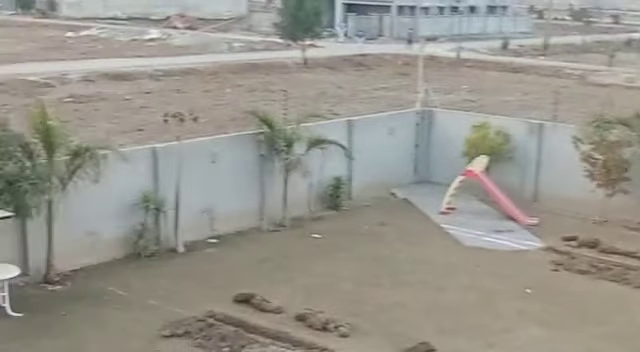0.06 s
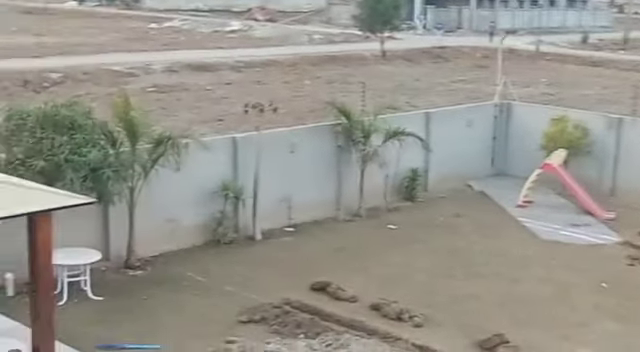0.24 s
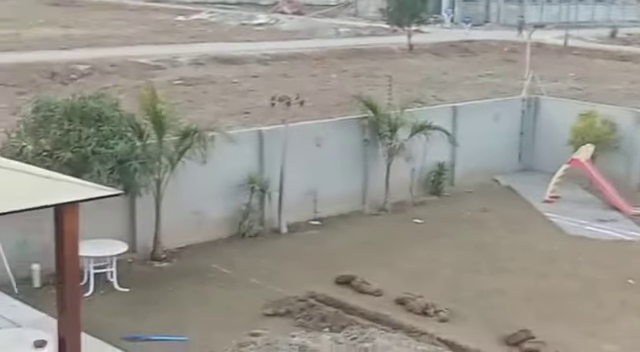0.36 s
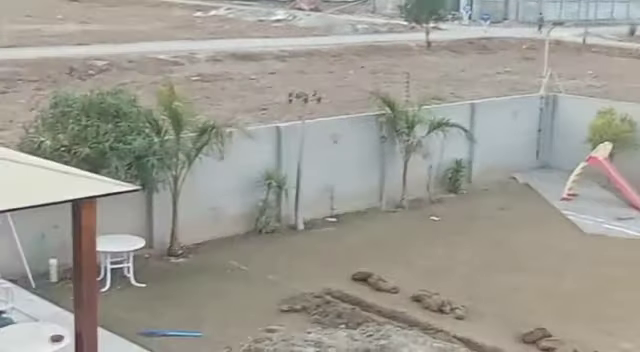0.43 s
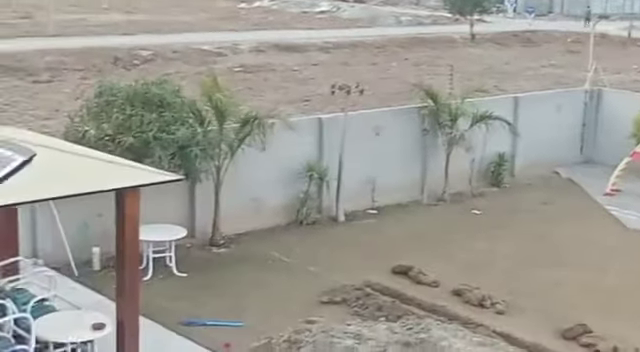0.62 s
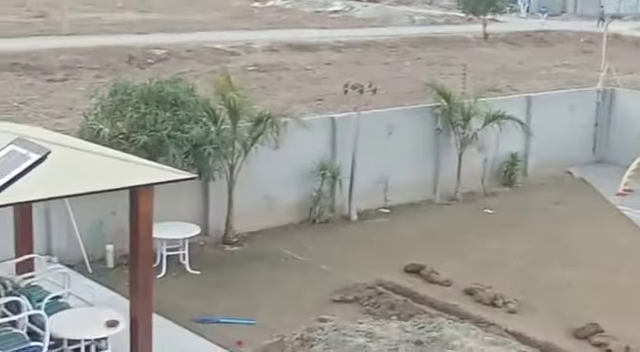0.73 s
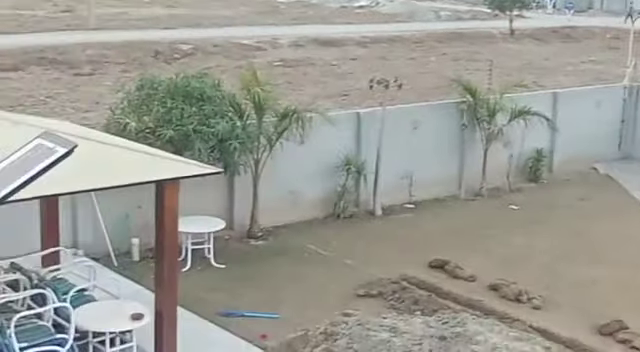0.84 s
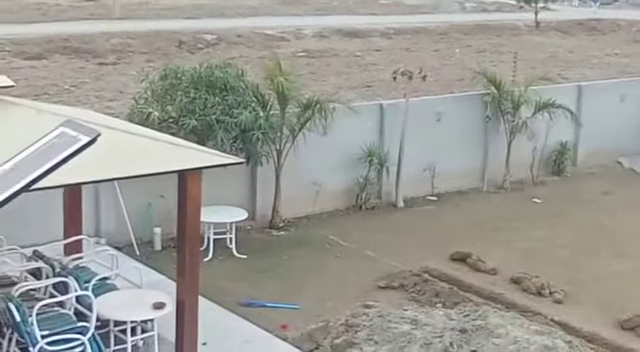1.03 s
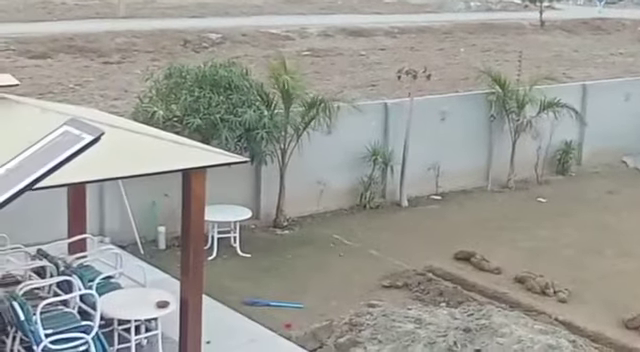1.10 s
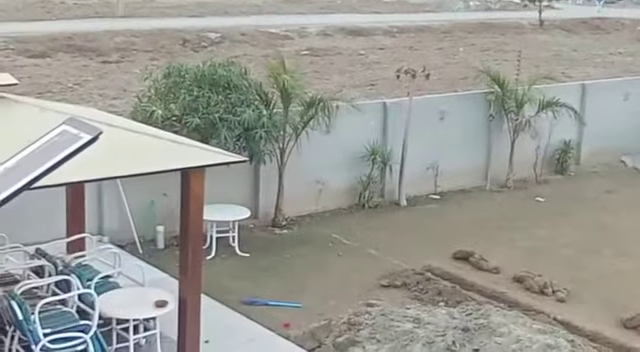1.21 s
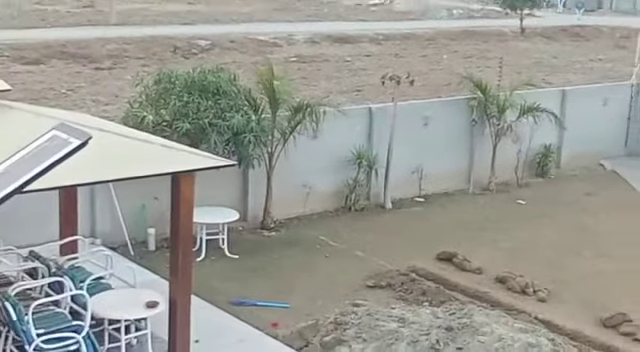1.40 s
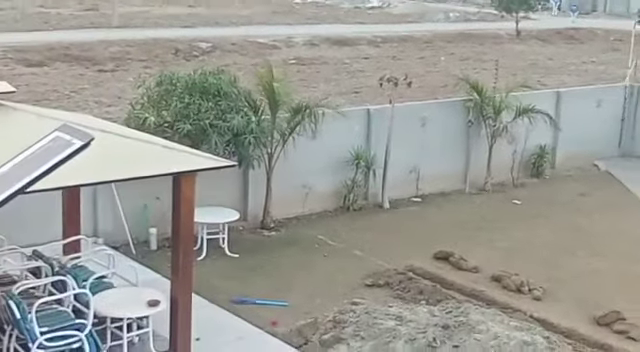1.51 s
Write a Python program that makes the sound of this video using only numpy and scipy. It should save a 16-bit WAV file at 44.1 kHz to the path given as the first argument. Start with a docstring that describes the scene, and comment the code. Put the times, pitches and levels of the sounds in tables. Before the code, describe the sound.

Wind buffets the microphone outdoors in two low, fluttering, slightly crackling gusts, from about 0.2 to 0.5 seconds and again from 1.0 to 1.2. Much quieter, a distant engine hums and rumbles for the whole second and a half. A far rasp and narrow whine, probably a cutting machine, ease off around 0.8 seconds, leaving faint traces and a thin hiss.

```python
"""A far engine hums and rumbles under a rasping hiss and a narrow whine, probably a cutting machine,
which eases off halfway. The hum is the engine's firing tone; whine and rasp are resonances driven by
friction, and distance dulls them all. Two gusts, the loudest sounds, buffet the microphone in the
open air: their turbulent eddies thump, flutter and crackle. Near the end comes one tiny, close tick."""
import sys
import numpy as np
from scipy import signal
from scipy.fft import rfft, irfft
from scipy.io import wavfile
from scipy.ndimage import uniform_filter1d

SR = 44100
rng = np.random.default_rng(int(sys.argv[2]) if len(sys.argv) > 2 else 0)


def bounce(signal):
    """Save signal as a 16-bit WAV file at the path given by the first command-line argument."""
    frames = np.transpose(np.atleast_2d(signal))
    limited = np.clip(frames, -1, 1)
    pcm = np.round(limited * 32767).astype(np.int16)
    wavfile.write(sys.argv[1], SR, pcm)


N = 68355
TIME = np.arange(N) / SR


def from_db(db):
    """Amplitude ratio of a level: a factor of ten per 20 dB."""
    return 10 ** (np.asarray(db) / 20)


def rms_one(x):
    """Normalisation to unit root-mean-square amplitude."""
    return x / np.sqrt(np.mean(x ** 2) + 1e-20)


def in_time(rows):
    """Linear interpolation: each column after t/s, at every sample."""
    times, *columns = np.transpose(rows)
    return [np.interp(TIME, times, column) for column in columns]


def swell(centre_s, sigma_s):
    """Gaussian envelope of height 1 and standard deviation sigma_s."""
    return np.exp(-.5 * ((TIME - centre_s) / sigma_s) ** 2)


def drift(rate_hz):
    """Random modulation: low-passed noise wanders slowly, with unit spread."""
    step, settle = 40, 2000  # samples per point; points dropped while the filter settles
    pole = np.exp(-2 * np.pi * rate_hz * step / SR)
    noise = rng.standard_normal(N // step + settle + 2)
    slow = signal.lfilter([1], [1, -2 * pole, pole * pole], noise)[settle:]
    return np.interp(np.arange(N) / step, np.arange(len(slow)), rms_one(slow))


def coloured_noise(spectrum):
    """Spectral shaping: white noise weighted by rows of f/Hz, relative density/dB; rms 1."""
    hz, db = np.transpose(spectrum)
    bins_hz = np.maximum(np.arange(N + 1) * SR / (2 * N), 1)
    gain = from_db(np.interp(np.log(bins_hz), np.log(hz), db))
    return rms_one(irfft(rfft(rng.standard_normal(2 * N)) * gain)[:N])


def resonance(hz, width_hz):
    """Forced resonance: noise drives two like resonators in series, each width_hz wide; rms 1."""
    radius = np.exp(-np.pi * width_hz / SR)
    section = [1 - radius, 0, radius - 1, 1, -2 * radius * np.cos(2 * np.pi * hz / SR), radius ** 2]
    return rms_one(signal.sosfilt([section, section], rng.standard_normal(2 * N))[N:])


def moving_lowpass(x, corner_hz, block=128):
    """Time-varying filter: a second-order low-pass whose corner moves block by block."""
    out, state = np.zeros(N), np.zeros(2)
    for i in range(0, N, block):
        b, a = signal.butter(2, np.clip(corner_hz[i], 60, SR / 4), fs=SR)
        out[i:i + block], state = signal.lfilter(b, a, x[i:i + block], zi=state)
    return out


def evened(x, share, window_s):
    """Envelope compression: a share of the chance swells is taken out of a noise; rms 1."""
    power = uniform_filter1d(x ** 2, int(window_s * SR))
    power = uniform_filter1d(power, int(window_s * SR / 2))
    return rms_one(x / (np.abs(power) + 1e-12) ** (share / 2))


def rings(rows):
    """Amplitude modulation: noise-driven resonances swell and fade under Gaussian envelopes."""
    return sum(from_db(db) * swell(t, sigma_s) * evened(resonance(hz, width), share=0.63, window_s=0.077)
               for t, db, sigma_s, hz, width in rows)


def air():
    """Broadband noise: a midrange rush dies away while a thin hiss swells, dulls and fades."""
    # envelopes: t/s, rush level/dB, hiss level/dB
    levels = [(0, -50.5, -69.5), (.14, -48, -65.5), (.32, -49.5, -70), (.52, -52.5, -58), (.76, -59.5, -59),
              (.92, -61, -58.5), (1.08, -66, -60.5), (1.2, -63.5, -61), (1.38, -63, -60.5),
              (1.55, -66.5, -64.5)]
    # midrange rush: f/Hz, relative density/dB
    rush_spectrum = [(150, -11.5), (330, 3), (500, 6.5), (680, 2.5), (1000, 5), (1400, -6), (1800, -22),
                     (3000, -3), (6000, -63), (7500, -57)]
    # thin hiss: f/Hz, relative density/dB
    hiss_spectrum = [(1500, -1.5), (2700, 4), (3400, -7), (3680, 3.5), (3880, 5), (4200, 0), (4850, -0.5),
                     (5450, -6.5), (6100, -15.5), (7000, -38.5)]
    rush_db, hiss_db = in_time(levels)
    corner_hz = 7200 - 2030 * TIME
    hiss = moving_lowpass(coloured_noise(hiss_spectrum), corner_hz)
    hiss = rms_one(moving_lowpass(hiss, corner_hz))
    rush = coloured_noise(rush_spectrum)
    floor = from_db(-89.5) * rng.standard_normal(N)
    return from_db(rush_db) * rush + from_db(hiss_db) * hiss + floor


def tick():
    """A transient: a very short burst of high noise is heard as one thin tick close by."""
    # burst: t/s, level/dB, sigma/s, f/Hz, bandwidth/Hz
    burst = [(1.277, -78, .0008, 13500, 4500)]
    return rings(burst)


def engine():
    """Periodic firing gives a wavering hum; a dull rumble swells with it, and faint drones come and go."""
    # envelope common to hum and rumble: t/s, relative level/dB
    levels = [(0, -45), (.07, -49.5), (.118, -44.5), (.17, -47.5), (.47, -44), (.52, -45), (.575, -41.5),
              (.61, -42), (.66, -49), (.73, -39.5), (.775, -45.5), (.82, -40.5), (.86, -46), (.94, -41.5),
              (.965, -44.5), (1.0, -47.5), (1.18, -45), (1.26, -52.5), (1.37, -51), (1.435, -45.5),
              (1.49, -50), (1.55, -47.5)]
    # rumble: f/Hz, relative density/dB
    rumble_spectrum = [(25, -20.5), (45, -9.5), (80, 1.5), (150, 3.5), (195, -1.5), (245, -1), (320, -1.5),
                       (400, -22), (510, -22.5), (640, -44), (1500, -74)]
    # low drones: t/s, level/dB, sigma/s, f/Hz, bandwidth/Hz
    drones = [(.57, -54.5, 0.14, 324, 40), (.52, -55, 0.059, 503, 30), (.87, -50.5, 0.013, 309, 31),
              (.965, -48, 0.0062, 257.5, 49), (1.31, -57.5, 0.019, 410, 116),
              (1.38, -56.5, 0.061, 164.5, 8.2), (1.48, -58, 0.028, 209, 58)]
    firing_hz, sag_hz_per_s, jitter_hz, waver_db = 100.26, 0.51, 0.87, 1.23
    level_db, = in_time(levels)
    pitch_hz = firing_hz - sag_hz_per_s * TIME + jitter_hz * drift(rate_hz=10)
    phase = 2 * np.pi * np.cumsum(pitch_hz) / SR
    hum_db = level_db - 3 + waver_db * drift(rate_hz=2.8)
    hum = from_db(hum_db) * rms_one(np.sin(phase))
    rumble_db = level_db - level_db.mean() - 53.5
    rumble = from_db(rumble_db) * coloured_noise(rumble_spectrum)
    return hum + rumble + rings(drones)


def machine():
    """Frictional excitation: rough contact drives a narrow whine and a rasp of higher resonances."""
    # envelope of the whine: t/s, level/dB
    whine_levels = [(0, -53), (.2, -52.5), (.39, -50.5), (.425, -50), (.47, -49), (.68, -49.5), (.73, -50),
                    (.795, -52), (.835, -64), (.89, -63.5), (.94, -50), (.985, -69), (1.03, -60),
                    (1.085, -61.5), (1.11, -52.5), (1.15, -59), (1.175, -64.5), (1.205, -57.5),
                    (1.35, -65.5), (1.42, -56.5), (1.48, -65), (1.55, -62.5)]
    # envelope of the rasp: t/s, relative level/dB
    rasp_levels = [(0, -48.5), (.15, -48), (.38, -46.5), (.54, -43.5), (.64, -45.5), (.76, -44.5),
                   (.85, -59), (1.05, -69.5), (1.2, -57), (1.33, -68.5), (1.4, -58), (1.55, -58.5)]
    # resonances of the rasp: f/Hz, bandwidth/Hz, relative level/dB
    rasp_modes = [(1510, 640, -12), (2171, 300, -8), (2496, 340, -13), (2992, 620, -13), (3337, 200, -19)]
    whine_hz, roughness_db = 1257, 1.0
    whine_db, = in_time(whine_levels)
    rasp_db, = in_time(rasp_levels)
    core = from_db(-7) * resonance(whine_hz, width_hz=97)
    band = resonance(whine_hz, width_hz=106)
    whine = from_db(whine_db) * evened(band + core, share=0.65, window_s=0.022)
    rasp = from_db(rasp_db) * sum(from_db(db) * resonance(hz, width) for hz, width, db in rasp_modes)
    return (whine + rasp) * from_db(roughness_db * drift(rate_hz=50))


def squeaks_and_scrapes():
    """Briefly driven resonances: faint squeaks, and shorter scrapes of wider bandwidth."""
    # squeaks: t/s, level/dB, sigma/s, f/Hz, bandwidth/Hz
    squeaks = [(0.543, -53.5, 0.03, 2260, 220), (0.74, -53, 0.12, 2675, 400),
               (0.835, -55, 0.053, 2690, 500), (0.975, -61.5, 0.054, 2790, 254.5),
               (1.204, -61, 0.038, 3490, 380), (1.391, -60.5, 0.023, 2680, 330),
               (1.494, -60.5, 0.026, 3175, 139)]
    # scrapes: t/s, level/dB, sigma/s, f/Hz, bandwidth/Hz
    scrapes = [(.543, -42.5, .005, 2150, 600), (.75, -57, .014, 4650, 500), (.757, -53, .016, 3250, 600)]
    return rings(squeaks) + rings(scrapes)


def from_afar(x, corner_hz=4300):
    """Attenuation with distance: a long path takes the treble away."""
    return signal.sosfilt(signal.butter(4, corner_hz, fs=SR, output="sos"), x)


def crackle():
    """Eddy break-up: the sharpest eddies end in brief bursts of brighter flutter."""
    # bursts: t/s, level/dB
    bursts = [(.232, -49), (0.281, -44), (0.3, -48.5), (0.352, -40.5), (1.101, -49), (1.119, -45),
              (1.134, -45.5), (1.173, -48)]
    envelope = sum(from_db(db) * swell(t, sigma_s=0.0016) for t, db in bursts)
    return envelope * evened(resonance(hz=690, width_hz=270), share=0.75, window_s=0.015)


def puffs():
    """Pressure pulses: each large eddy is a short wave packet of low flutter."""
    # single eddies within the gusts: t/s, level/dB, sigma/s, nominal f/Hz
    eddies = [(0.249, -26.5, 0.0026, 378), (.258, -30, 0.013, 88), (0.269, -26.5, .003, 200),
              (0.287, -23, 0.001, 254.6), (0.3, -26, 0.0022, 282), (.316, -23.5, 0.0045, 193),
              (.325, -25, 0.0032, 214), (0.347, -20.5, 0.0016, 223), (.395, -22, 0.0017, 162),
              (0.401, -32.5, 0.01, 94.3), (.416, -34.5, 0.0047, 158), (1.068, -33, 0.0035, 270),
              (1.095, -24, 0.013, 120.6), (1.098, -28, 0.0054, 310), (1.119, -25, 0.0096, 176),
              (1.133, -33.5, .0026, 380), (1.158, -35, 0.0031, 229), (1.192, -53, 0.011, 116.5)]
    pitch_spread = 0.072  # as a share of the frequency
    chances = rng.uniform(-0.87, 1, (len(eddies), 2))
    out = np.zeros(N)
    for (t, db, sigma_s, nominal_hz), (half_turns, detune) in zip(eddies, chances):
        hz = nominal_hz * (1 + pitch_spread * detune)
        flutter = np.sin(2 * np.pi * hz * (TIME - t) + np.pi * half_turns)
        out += from_db(db) * swell(t, sigma_s) * rms_one(flutter)
    return out


def wind():
    """Turbulence: eddies thump on the microphone port, louder and brighter as a gust strengthens."""
    # one envelope per gust: t/s, relative level/dB
    gusts = [
        [(.17, -62.5), (.21, -35), (.244, -25.5), (.275, -30), (.32, -27), (.338, -36.5), (.375, -30.5),
         (.405, -35), (.435, -42), (.462, -35.5), (.50, -57)],
        [(1.025, -45.5), (1.056, -30.5), (1.095, -27.5), (1.125, -25), (1.165, -37.5), (1.225, -53)],
    ]
    # buffeting pressure: f/Hz, relative density/dB
    buffet_spectrum = [(25, -40), (42, -29.5), (66, 1), (120, -2), (205, -1.5), (300, -8), (490, -13),
                       (650, -23), (1000, -36.5), (1800, -66.5)]
    peak_corner_hz, octaves_per_db, gain_db = 585, 0.22, -3.5
    strength = sum(from_db(np.interp(TIME, *np.transpose(gust), left=-90, right=-90)) for gust in gusts)
    strength = uniform_filter1d(strength, size=256)
    db_re_peak = 20 * np.log10(strength / strength.max())
    corner_hz = peak_corner_hz * 2 ** (octaves_per_db * db_re_peak)
    eddies = moving_lowpass(coloured_noise(buffet_spectrum), corner_hz)
    return from_db(gain_db) * strength * evened(eddies, share=0.75, window_s=0.015)


def scene():
    """Superposition: near and distant sources add at one microphone."""
    gusts = wind() + puffs() + crackle()
    distant = from_afar(engine() + machine() + squeaks_and_scrapes())
    return (gusts + distant + air() + tick())[None]


def record(dry, stopband_hz=15500):
    """Band limiting: a steep low-pass holds the highest treble 70 dB down."""
    return signal.sosfilt(signal.cheby2(12, 70, stopband_hz, fs=SR, output="sos"), dry)


dry = scene()
out = record(dry)
bounce(out)
```